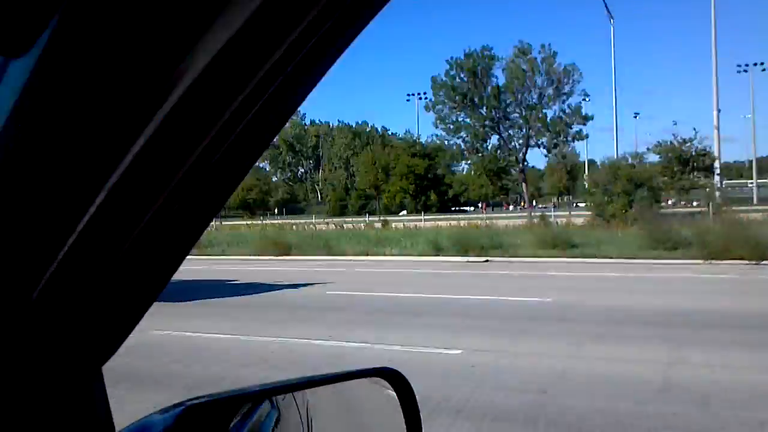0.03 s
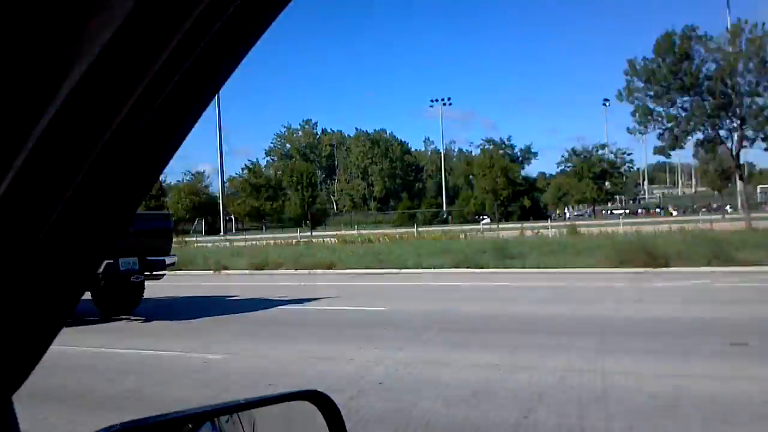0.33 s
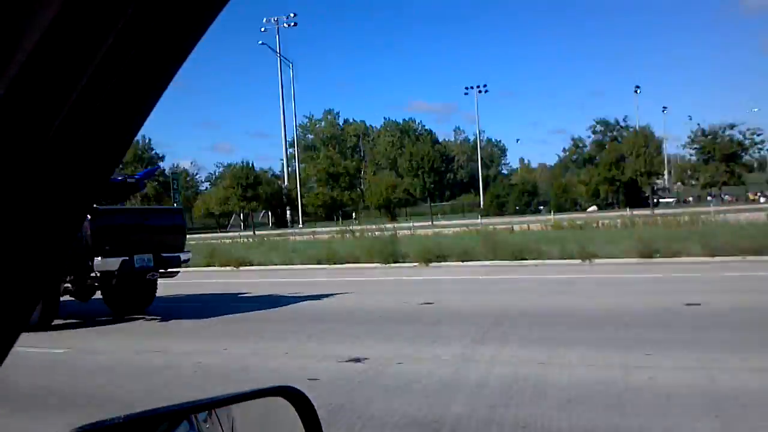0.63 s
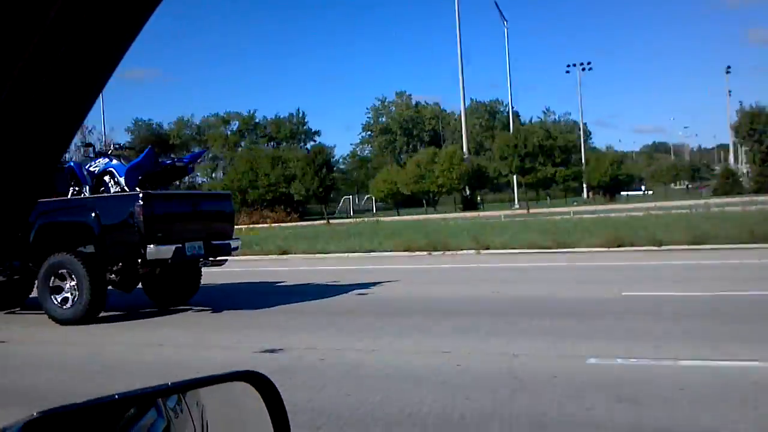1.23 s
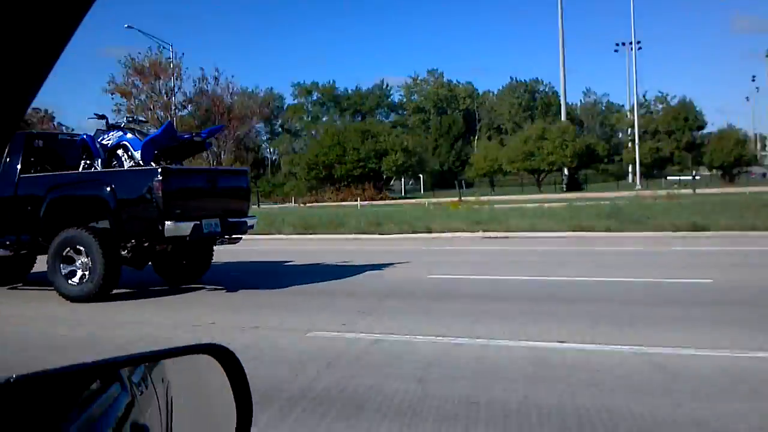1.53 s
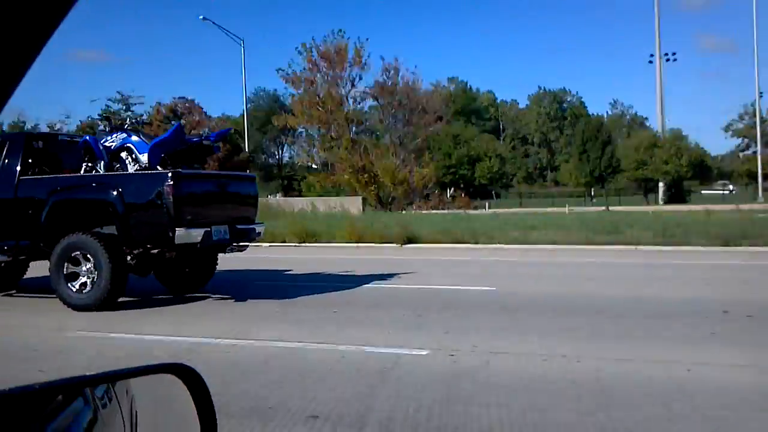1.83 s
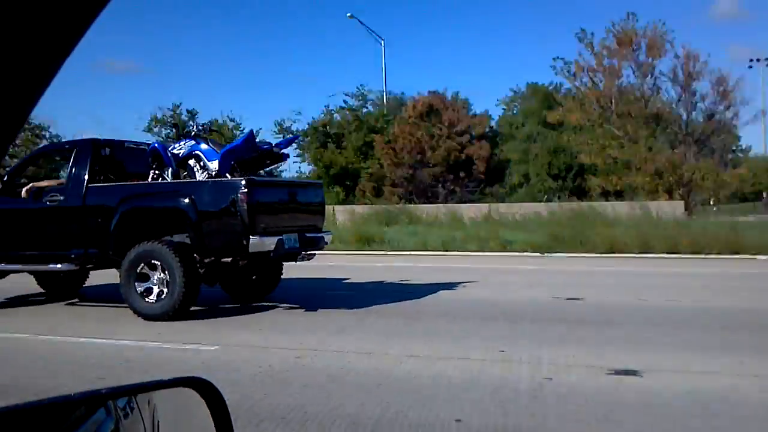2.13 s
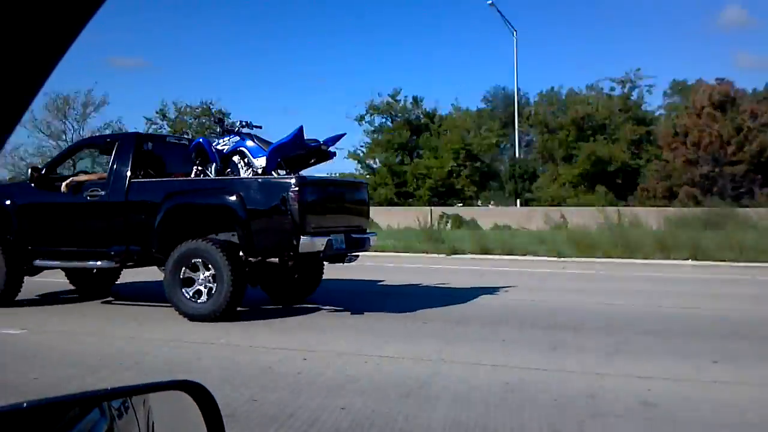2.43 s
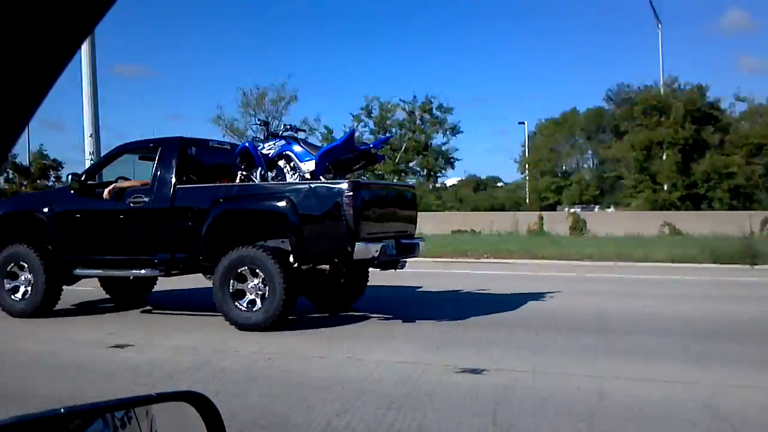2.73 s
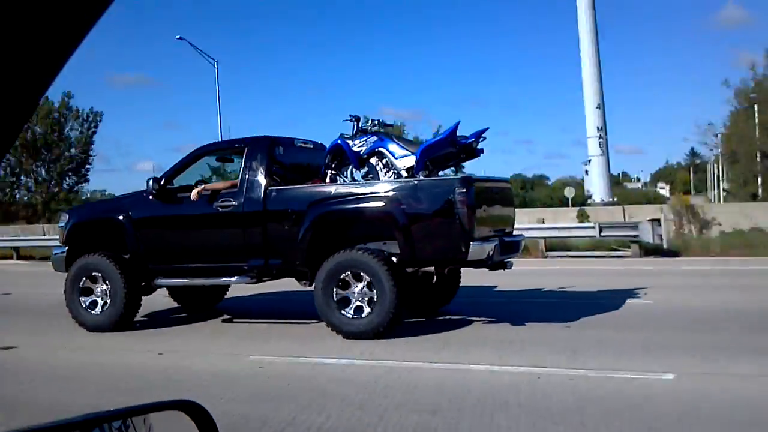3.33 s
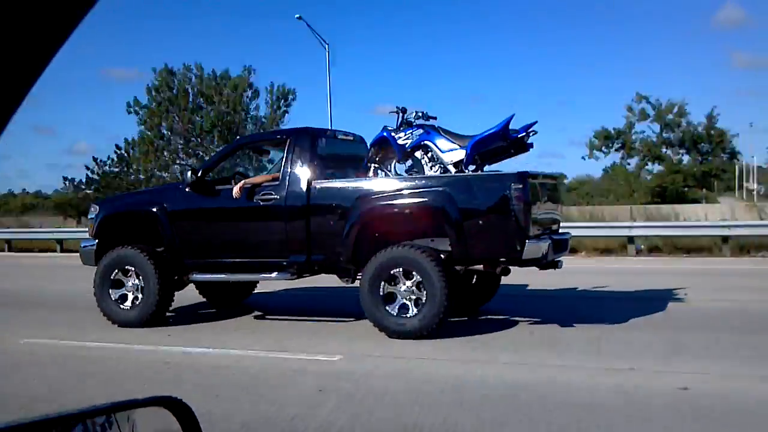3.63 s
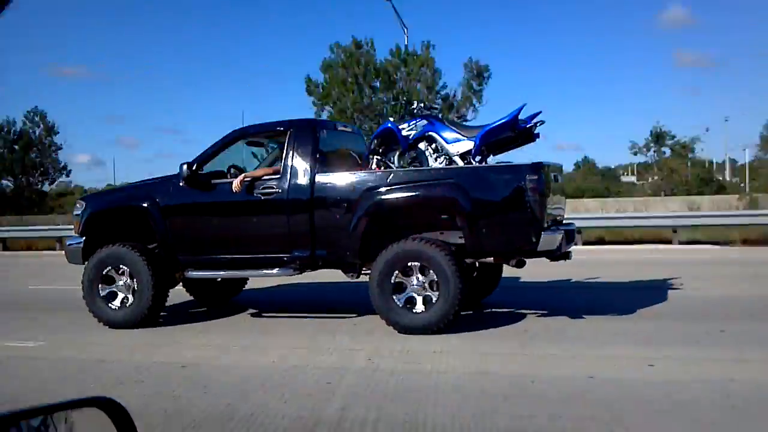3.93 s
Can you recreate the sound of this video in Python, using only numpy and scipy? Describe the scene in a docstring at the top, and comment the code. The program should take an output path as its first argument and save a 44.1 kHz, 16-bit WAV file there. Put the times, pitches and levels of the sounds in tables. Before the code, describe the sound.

Loud highway road roar with wind buffeting an open car window as a pickup draws alongside.

```python
"""Inside a car at highway speed, side window open. Tyres roar on concrete throughout, their tread tone
throbbing with each wheel turn; wind buffets the opening and hisses along the frame; the cabin air booms.
An engine drone drops out in the first second, then a thin tyre whine fades. The level ducks after a hard
gust at 1.3 s. The hiss grows, spurts and whistles once near 3.4 s. Last, a pickup draws alongside:
its tyres howl and the roar brightens."""
import sys
import numpy as np
from scipy.fft import rfft, irfft
from scipy.io import wavfile
from scipy.ndimage import uniform_filter1d, minimum_filter1d

SR = 44100
rng = np.random.default_rng(int(sys.argv[2]) if len(sys.argv) > 2 else 0)


def transcribe(u):
    """Save the signal u as a 16-bit wav file named by the first command-line argument.

    u: samples, shape (n,) or (channels, n), limited to [-1, 1]; the rate is SR.
    q: integer samples, one column per channel.
    """
    v = np.clip(np.atleast_2d(u).T, -1, 1)
    q = np.round(v * 32767).astype(np.int16)
    wavfile.write(sys.argv[1], SR, q)


N = 176400
TIME_S, BINS_HZ = np.arange(N) / SR, np.fft.rfftfreq(N, 1 / SR)


def from_db(db):
    """Decibels to gain."""
    return 10 ** (np.asarray(db) / 20)


def unit_rms(x):
    """Scale to rms 1."""
    return x / np.sqrt(np.mean(x ** 2) + 1e-20)


def per_sample(rows):
    """Columns of a time table, interpolated at every sample."""
    time_s, *columns = np.transpose(rows)
    return [np.interp(TIME_S, time_s, column) for column in columns]


def per_bin(rows):
    """Frequency table, interpolated at every bin on a log axis."""
    freq_hz, value = np.transpose(rows)
    return np.interp(np.log(BINS_HZ + 1), np.log(freq_hz), value)


def drift(rate_hz):
    """Low-passed noise, rms 1."""
    return unit_rms(irfft(rfft(rng.standard_normal(N)) / (1 + (BINS_HZ / rate_hz) ** 2), N))


def swell(peak_s, half_width_s):
    """Gaussian envelope, height 1."""
    return np.exp(-((TIME_S - peak_s) / half_width_s) ** 2)


def tone(pitch_hz, width_hz, rough):
    """Sine plus narrow noise around its pitch, rms 1."""
    phase = 2 * np.pi * np.cumsum(pitch_hz * np.ones(N)) / SR
    in_phase = (1 + rough * drift(width_hz)) * np.sin(phase)
    return unit_rms(in_phase + rough * drift(width_hz) * np.cos(phase))


def swelling_tones(rows, width_hz, rough):
    """Noisy tones that each swell and fade."""
    return sum(from_db(level_db) * swell(peak_s, half_width_s) * tone(pitch_hz, width_hz, rough)
               for peak_s, pitch_hz, level_db, half_width_s in rows)


def glide(rows, width_hz, rough):
    """Tone on a pitch and level curve, silent outside it."""
    pitch_hz, level_db = per_sample(rows)
    gate = (TIME_S >= rows[0][0]) & (TIME_S <= rows[-1][0])
    return from_db(level_db) * tone(pitch_hz, width_hz, rough) * gate


# Left-right noise coherence: freq_hz, coherence_ratio
COHERENCE = [(60, 0.99), (130, 0.77), (230, 0.06), (420, 0.13), (520, 0.9), (660, 0.4), (850, 0.83),
             (1350, 1), (1750, 0.51), (2300, 0.77), (2800, 1), (3400, 0.56), (4600, 0.64), (5500, 0.92),
             (8000, 1), (12000, 1)]

def turbulence(spectrum, shared_db, per_band_db, rate_hz):
    """Stereo noise, rms 1; octave bands flicker both together and separately."""
    coherence = np.clip(per_bin(COHERENCE), 0, .995)
    mid, side = rfft(rng.standard_normal((2, N)))
    pair = np.sqrt(1 + coherence) * mid + np.sqrt(1 - coherence) * side * [[1], [-1]]
    pair *= from_db(per_bin(spectrum))
    shared, octave, noise = drift(rate_hz), np.log2(BINS_HZ + 1), 0
    for centre in range(4, 15):
        band = irfft(pair * np.maximum(1 - abs(octave - centre), 0), N)
        noise += band * from_db(shared_db * shared + per_band_db * drift(rate_hz))
    return unit_rms(noise)


# Engine drone: firing_multiple, full_load_db, fade_mid_s
ENGINE_ORDERS = [(3, -25.5, 0.446), (4, -25.5, 0.95)]

def engine(firing_hz=96.4, load_db_per_s=7, fade_s=0.13):
    """Engine orders build under load and drop out as the throttle eases."""
    drone = 0
    for multiple, full_load_db, fade_mid_s in ENGINE_ORDERS:
        load = from_db(full_load_db + load_db_per_s * np.minimum(TIME_S - fade_mid_s, 0))
        throttle = np.clip((fade_mid_s - TIME_S) / fade_s + .5, 0, 1)
        drone += load * throttle * tone(multiple * firing_hz, width_hz=5.2, rough=0.18)
    return drone


# Arching whistle: time_s, pitch_hz, level_db
EDGE_WHISTLE = [(3.29, 6300, -50), (3.32, 6640, -34), (3.355, 7540, -36), (3.378, 7600, -33),
                (3.4, 7680, -29), (3.425, 7560, -43), (3.46, 7400, -62)]
# Breathy half-whistles: peak_s, pitch_hz, level_db, half_width_s
EDGE_BREATHS = [(.08, 5320, -36.5, 0.11), (.38, 5050, -34, 0.07), (.51, 6300, -36, 0.07),
                (.52, 4420, -36, 0.06), (.53, 7000, -41, 0.054), (.82, 4520, -41.5, 0.06),
                (1.3, 4560, -42.5, 1), (2.18, 5070, -31, 0.086), (3.22, 4600, -33, 0.016)]

def edge_tones():
    """Air over the window edge: one clear whistle, several breathy ones."""
    whistle = glide(EDGE_WHISTLE, width_hz=88, rough=.4)
    return whistle + swelling_tones(EDGE_BREATHS, width_hz=220, rough=3.3)


# Hiss envelope: time_s, level_db
HISS_ENVELOPE = [(0, -33), (.32, -32), (.4, -32.5), (.55, -30), (.68, -31), (.82, -30.5), (1.0, -32),
                 (1.35, -31.5), (1.75, -30), (2.18, -28.5), (2.38, -28.5), (2.55, -27), (2.8, -28.5),
                 (3.22, -26.5), (3.55, -27.5), (3.71, -27), (3.81, -26), (4, -27)]
# Hiss spectrum: freq_hz, relative_density_db
HISS_SPECTRUM = [(1000, -37), (2500, 3), (3200, 0.5), (4000, 1), (5000, .5), (6500, 1.5), (7500, -3.5),
                 (8500, -9), (10000, -15.5), (12000, -21), (15000, -27)]
# Air spurts: peak_s, level_db, half_width_s
AIR_SPURTS = [(.57, -41, 0.035), (0.775, -38, .03), (0.94, -36, 0.028), (1.194, -40, 0.07),
              (2.18, -42, 0.027), (2.492, -32.5, .035), (2.651, -36, .02), (2.873, -40, .02),
              (3.0, -34.5, 0.14), (3.23, -37, 0.036), (3.417, -37, 0.033), (3.522, -34, .03),
              (3.616, -33.5, 0.019), (3.81, -35, 0.024), (3.969, -46, .03)]
# Spurt and flutter spectrum: freq_hz, relative_density_db
BRIGHT_SPECTRUM = [(2000, -25), (5000, -3), (7500, 11.5), (10000, 3), (12500, -8), (15000, -16)]

def frame_wind(flutter_re_hiss_db=-14.5):
    """Air rushing along the window frame: hiss, brighter flutter, short spurts."""
    hiss_db, = per_sample(HISS_ENVELOPE)
    hiss = turbulence(HISS_SPECTRUM, shared_db=.5, per_band_db=1, rate_hz=23)
    flutter = turbulence(BRIGHT_SPECTRUM, shared_db=3, per_band_db=2, rate_hz=29)
    spurts = turbulence(BRIGHT_SPECTRUM, shared_db=2, per_band_db=-1, rate_hz=39)
    spurt_gain = sum(from_db(level_db) * swell(peak_s, half_width_s)
                     for peak_s, level_db, half_width_s in AIR_SPURTS)
    return from_db(hiss_db) * (hiss + from_db(flutter_re_hiss_db) * flutter) + spurt_gain * spurts


# Cabin resonances: peak_s, pitch_hz, level_db, half_width_s
CABIN_MODES = [(4, 130, -26, 1.8), (2.1, 204, -24, 3.5), (3.3, 268, -27, 0.95)]

def cabin_boom():
    """Air resonances of the cabin swell and fade slowly."""
    return swelling_tones(CABIN_MODES, width_hz=11.7, rough=1.0)


# Rumble spectrum: freq_hz, relative_density_db
RUMBLE_SPECTRUM = [(20, -39), (40, -23), (70, -8.5), (100, -1), (130, 1.5), (200, -1), (270, -2),
                   (350, -3.5), (500, -10.5), (680, -15), (900, -19), (3000, -74)]
# Gusts: peak_s, bass_rise_db, half_width_s
BASS_GUSTS = [(0.747, 2.5, .03), (1.243, 8.5, 0.033), (1.337, 8.5, 0.037), (2.003, 6, 0.03),
              (2.727, 7, 0.087), (2.978, 8, 0.028)]

def buffeting(start_db=-19, fall_db_per_s=0.84, gust_below_hz=170):
    """Air rumbles in the window opening; gusts lift its bass."""
    rumble = turbulence(RUMBLE_SPECTRUM, shared_db=0.66, per_band_db=-0.7, rate_hz=18)
    rumble *= from_db(start_db - fall_db_per_s * TIME_S)
    bass = irfft(rfft(rumble) / (1 + (BINS_HZ / gust_below_hz) ** 4), N)
    gust_db = sum(rise_db * swell(peak_s, half_width_s) for peak_s, rise_db, half_width_s in BASS_GUSTS)
    return rumble + (from_db(gust_db) - 1) * bass


# Faint road tones: peak_s, pitch_hz, level_db, half_width_s
ROAD_TONES = [(0.9, 1195, -30, 0.27), (0.75, 857, -28.5, 0.28), (1.75, 899, -32, 0.53),
              (2.25, 1204, -27.5, 0.54), (2.6, 1056, -26, 0.5), (3.1, 905, -25, 0.4), (3.4, 1001, -24, .15),
              (3.7, 790, -27.5, 0.27)]

def road_singing():
    """Faint tones come and go, likely tyres singing on the concrete."""
    return swelling_tones(ROAD_TONES, width_hz=15, rough=1.3)


# Thin whine: time_s, pitch_hz, level_db
TYRE_WHINE = [(0, 1064, -30.5), (.5, 1058, -28), (1.22, 1052, -27), (1.45, 1050, -45)]
# Pickup tyre howl: time_s, pitch_hz, level_db
PICKUP_HOWL = [(3.2, 763, -42), (3.55, 752, -28.5), (3.8, 746.3, -24), (4, 745, -24)]

def tyre_tones():
    """An early tyre whine; a late howl from the pickup's tyres as it draws level."""
    return glide(TYRE_WHINE, width_hz=6.2, rough=0.29) + glide(PICKUP_HOWL, width_hz=16, rough=0.48)


# Tread tone: time_s, pitch_hz, level_db
TREAD_CURVE = [(0, 488.5, -32), (.6, 504.7, -34), (1.15, 513, -31.5), (2.3, 509, -37.5),
               (2.6, 504.5, -26.5), (3.3, 499.5, -28), (4, 496.4, -26)]

def tyre_tread(wheel_hz=12.27, throb_depth=0.8, throb_peak_s=3.152, jitter_rad=0.36, waver_hz=2.49):
    """The tread sings a wavering tone that throbs once per wheel turn."""
    pitch_hz, level_db = per_sample(TREAD_CURVE)
    wheel_rad = 2 * np.pi * wheel_hz * (TIME_S - throb_peak_s) + jitter_rad * drift(5)
    tread = tone(pitch_hz + waver_hz * drift(8.2), width_hz=7.9, rough=0.39)
    return from_db(level_db) * unit_rms(tread * (1 + throb_depth * np.cos(wheel_rad)))


# Roar envelope before the treble lift: time_s, level_db
ROAR_ENVELOPE = [(0, -17), (.55, -15.5), (1.3, -15.5), (1.9, -15.5), (2.3, -15), (2.9, -15.5), (3.6, -14),
                 (4, -15.5)]
# Roar spectrum: freq_hz, relative_density_db
ROAR_SPECTRUM = [(250, -17), (440, -9), (580, -5.5), (690, -9.5), (760, -2.5), (900, 0), (1100, 0),
                 (1300, -4), (1500, -4.5), (1800, -9.5), (2100, -12), (2500, -20), (3200, -52), (6000, -65)]

def tyre_roar(alongside_s=3.95, lift_db=3, lift_above_hz=1280):
    """Broad roar of tyres rolling on concrete, brighter as the pickup draws level."""
    level_db, = per_sample(ROAR_ENVELOPE)
    roar = turbulence(ROAR_SPECTRUM, shared_db=0.34, per_band_db=0.17, rate_hz=18)
    treble = irfft(rfft(roar) / (1 + (lift_above_hz / (BINS_HZ + 1)) ** 10), N)
    lift = from_db(lift_db * swell(alongside_s, half_width_s=0.62))
    return from_db(level_db) * (roar + (lift - 1) * treble)


def scene(fade_s=.004):
    """Tyres, car and wind, summed with soft ends."""
    tyres = tyre_tread() + tyre_tones() + tyre_roar() + road_singing()
    car = engine() + cabin_boom()
    wind = buffeting() + frame_wind() + edge_tones()
    fade = np.minimum(np.minimum(TIME_S, TIME_S[::-1]) / fade_s, 1)
    return (tyres + car + wind) * fade


# Channel balance: freq_hz, left_minus_right_db
CHANNEL_BALANCE = [(60, -3.5), (200, -0.6), (400, -0.3), (600, 0.5), (1100, -0.1), (1350, -2), (1620, -6.5),
                   (2050, 0.5), (2800, -1), (4200, -2), (5500, -2), (7000, -3), (10000, -0.3)]
# Channel phase: freq_hz, left_lead_rad
CHANNEL_PHASE = [(50, 2.9), (210, 2.6), (300, 1.5), (400, .5), (1300, .1), (1500, -.3), (1850, -2.9),
                 (2400, -3.7), (2780, -3.14), (3900, -.2), (4500, .1), (5000, 1.9), (5512, 3.14),
                 (16536, 28.27)]

def record(dry, duck_start_s=1.348, duck_db=3.5, attack_s=0.036, recovery_s=0.58):
    """One timed duck, left-right colour and phase, peak limiter, low-pass."""
    ceiling, cutoff_hz = .93, 15200
    since_s = TIME_S - duck_start_s
    duck = np.clip(since_s / attack_s, 0, 1) * np.clip(1 - since_s / recovery_s, 0, 1)
    sides = np.array([[.5], [-.5]])
    colour = from_db(sides * per_bin(CHANNEL_BALANCE))
    colour /= np.sqrt(np.mean(colour ** 2, axis=0))  # constant power
    phase_shift = np.exp(1j * sides * np.interp(BINS_HZ, *np.transpose(CHANNEL_PHASE)))
    stereo = irfft(rfft(dry * from_db(-duck_db * duck)) * colour * phase_shift, N)
    limiter_gain = ceiling / np.maximum(abs(stereo), ceiling)
    limiter_gain = uniform_filter1d(minimum_filter1d(limiter_gain, size=81), size=81)
    return irfft(rfft(stereo * limiter_gain) / np.sqrt(1 + (BINS_HZ / cutoff_hz) ** 300), N)


dry = scene()
out = record(dry)
transcribe(out)
```